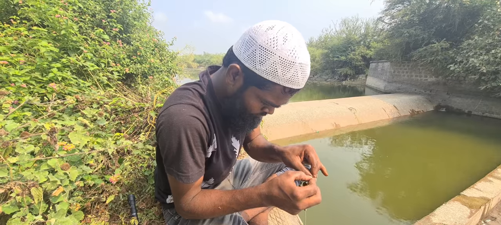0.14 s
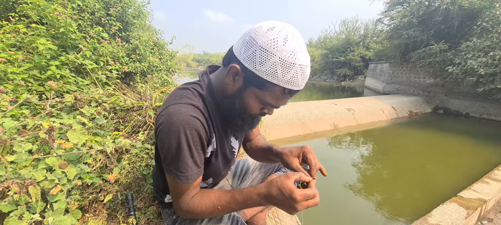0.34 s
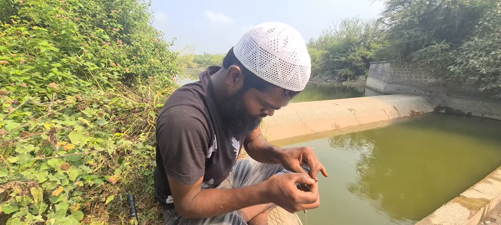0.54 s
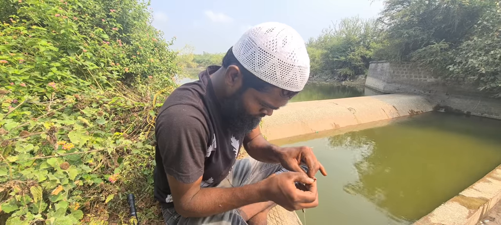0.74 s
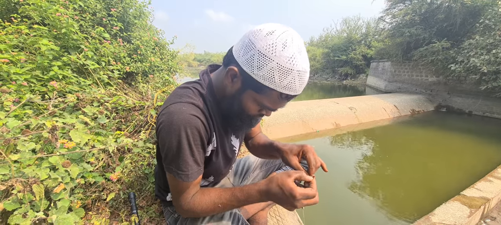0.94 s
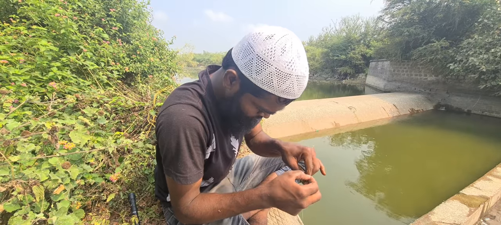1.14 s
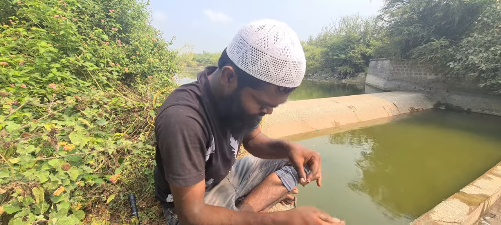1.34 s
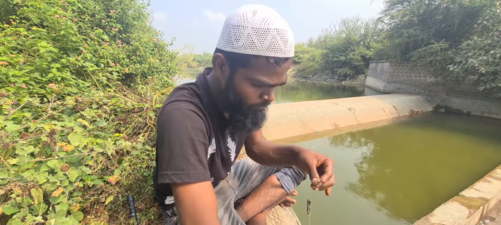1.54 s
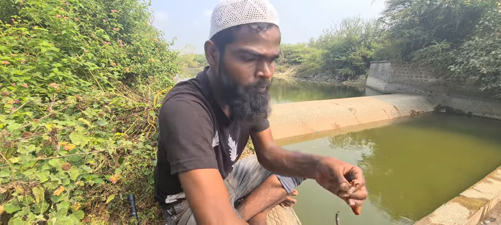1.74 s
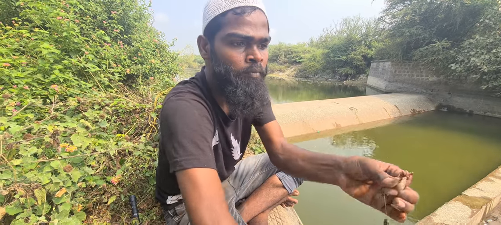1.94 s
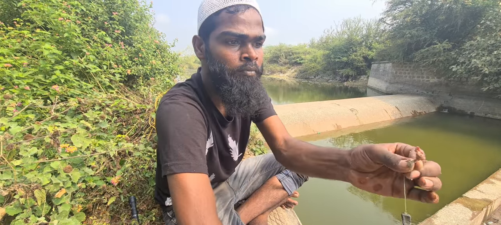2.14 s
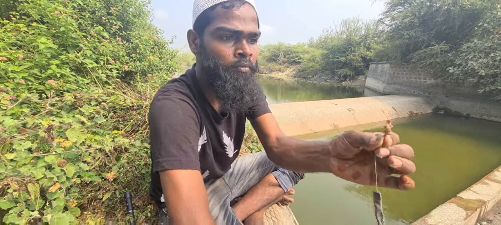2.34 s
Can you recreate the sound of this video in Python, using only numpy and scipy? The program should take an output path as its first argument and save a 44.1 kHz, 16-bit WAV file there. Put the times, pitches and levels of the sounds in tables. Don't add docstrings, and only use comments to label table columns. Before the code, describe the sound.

A near bird's clear, varied whistles end in a harsh pulsing buzz; behind it, rising chips turn into a rapid rattling trill blurred by leaves. Faint low pipes and quiet airy hiss surround them in the open.

```python
import sys
import numpy as np
from scipy import signal
from scipy.fft import rfft, irfft
from scipy.io import wavfile
from scipy.ndimage import uniform_filter1d

SR = 44100
rng = np.random.default_rng(int(sys.argv[2]) if len(sys.argv) > 2 else 0)


def invert_db(x):
    u = np.asarray(x, float) / 20
    return 10 ** u


def transcribe(signal):
    frames = np.atleast_2d(signal).T
    limited = np.clip(frames, -1, 1)
    pcm = np.round(limited * 32767).astype(np.int16)
    wavfile.write(sys.argv[1], SR, pcm)


N = 108045
LEAD = SR // 4


def slow(rate, size):
    r = np.exp(-2 * np.pi * rate / SR)
    x = signal.lfilter([1], [1, -2 * r, r * r], rng.standard_normal(size + 4000))[4000:]
    return x / x.std()


def coloured(points):
    hz = np.maximum(np.arange(N // 2 + 1) * SR / N, 10)
    points = np.array(points)
    gain = invert_db(np.interp(np.log(hz), np.log(points[:, 0]), points[:, 1]))
    x = irfft(rfft(rng.standard_normal(N)) * gain, N)
    return x / x.std()


def air():
    # f/Hz, density/dB
    air_colour = [(200, 2), (833, -7.5), (1330, -11), (2290, -13), (4010, -12), (8500, -14), (14300, -21),
                  (14700, -64)]
    # f/Hz, density/dB
    side_colour = [(18, -44), (30, 0), (263, -8.5), (816, -10.5), (1110, -4.5), (2530, -11), (3090, -24),
                   (6000, -25), (7800, -35), (13200, -120)]
    hiss_band = [2190, 16100]
    t = np.arange(N) / SR

    high_pass = signal.butter(4, 263.6, "high", fs=SR, output="sos")
    low_pass = signal.butter(2, 140, "low", fs=SR, output="sos")
    rumble = signal.sosfilt(low_pass, rng.standard_normal(N))
    mid = invert_db(-47 + 0.6 * slow(12.3, N)) * signal.sosfilt(high_pass, coloured(air_colour))
    mid = mid + invert_db(-77 + 1.5 * slow(5.5, N)) * rumble / rumble.std()

    hiss = signal.sosfilt(signal.butter(2, hiss_band, "band", fs=SR, output="sos"), mid)
    sink_db = -6.5 * np.clip((t - 2.165) / 0.13, 0, 1)
    mid = mid + hiss * (invert_db(sink_db) - 1)

    machine = invert_db(-66 + 3.5 * slow(30, N)) * np.sin(2 * np.pi * 1080 * t)
    opening = np.clip((t - 1.397) / 0.12, 0, 1)
    side = opening * (invert_db(-62.5) * coloured(side_colour) + machine)
    return mid + side * np.array([[1], [-1]])


def whistle(track, rows, warble=None, half_db=-94.0, rough=1, over_db=-94.0):
    s, hz, db = np.transpose(rows)
    t = np.arange(s[0], s[-1], 1 / SR)
    size = len(t)
    slur = max(1, int(min(0.0049, (s[-1] - s[0]) / 10) * SR))
    pitch = uniform_filter1d(np.interp(t, s, hz), slur, mode="nearest")
    rough_db, rough_hz = 1.6 * rough, 18 * rough
    level = np.interp(t, s, db) + rough_db * np.minimum(slow(257, size + 500)[:size], 1)
    if warble:
        bend, throb = warble(t)
        pitch, level = pitch + bend, level + throb
    pitch = pitch + rough_hz * slow(166, size + 500)[:size]
    phase = 2 * np.pi * np.cumsum(pitch) / SR
    tone = np.sin(phase)
    tone = tone + invert_db(half_db) * np.sin(phase / 2)
    tone = tone + invert_db(over_db) * np.sin(2 * phase)
    edge = np.clip(np.minimum(t - s[0], s[-1] - t) / 0.00061, 0, 1)
    i = LEAD + int(s[0] * SR)
    track[i:i + size] += np.sqrt(2) * invert_db(level) * edge * tone


def bushes(x, wet_db, scatter_s, late_db, t60):
    t = np.arange(SR) / SR
    decay = np.exp(-(t / scatter_s) ** 2) + invert_db(late_db - 60 * t / t60)
    tail = rng.standard_normal(SR) * decay * np.clip(t / 0.0066, 0, 1)
    return invert_db(wet_db) * signal.fftconvolve(x, tail / np.sqrt(np.sum(tail ** 2)))[LEAD:len(x)]


def strokes(track, marks, shape, growth=0):
    for s, db in marks:
        scale = 1 + 0.00693 * rng.standard_normal()
        note = np.array(shape) * [1, scale, 1] + [s, 0, db]
        note[:2, 2] += growth * (s - marks[-1][0]) * np.array([1, 0.5])
        whistle(track, note, rough=1.2)


def far_bird():
    # t/s, level/dB
    chip_marks = [(-.07, -46.5), (.068, -41.5), (.198, -42), (.319, -41), (.436, -40.5), (.547, -41),
                  (.657, -40), (.768, -39), (.872, -35.5)]
    # t/s from its mark, f/Hz, level/dB
    chip = [(-.008, 4900, -10), (-.004, 6000, 4), (-.001, 7050, 10), (.002, 8050, 2), (.006, 8800, -16)]
    # t/s, level/dB
    trill_marks = [(.947, -38), (1.02, -36.5), (1.08, -36), (1.141, -35.5), (1.204, -33.5), (1.267, -39),
                   (1.328, -33.5), (1.391, -32.5), (1.458, -32), (1.522, -31.5), (1.59, -31.5),
                   (1.654, -31), (1.721, -31), (1.79, -32), (1.857, -31.5), (1.926, -31.5), (1.996, -31.5),
                   (2.068, -30), (2.14, -31.5)]
    # t/s from its mark, f/Hz, level/dB
    stroke_up = [(-.029, 4550, -17), (-.025, 5300, -8), (-.021, 5950, -1), (-.015, 6500, 2),
                 (-.008, 6800, -3)]
    # t/s from its mark, f/Hz, level/dB
    stroke_down = [(-.005, 9200, -36), (-.001, 8650, -12), (.001, 8350, -2), (.005, 7550, -2),
                   (.01, 6800, 1), (.017, 6650, -7)]
    # t/s from its mark, f/Hz, level/dB
    stroke_low = [(0.016, 5582, -34), (0.025, 5890, 2.5), (0.033, 6900, -13)]

    clear, veiled, chips = np.zeros((3, N + LEAD))
    strokes(chips, chip_marks, chip)
    strokes(veiled, trill_marks, stroke_up, growth=28)
    strokes(clear, trill_marks, stroke_down)
    strokes(veiled, trill_marks, stroke_low)
    direct = clear + invert_db(-2) * veiled + invert_db(-6.5) * chips
    smear = bushes(direct, -3, scatter_s=0.007, late_db=-60, t60=1)
    echoes = bushes(clear + veiled + chips, 2, scatter_s=0.09, late_db=-7, t60=0.93)
    return direct[LEAD:] + smear + echoes


def near_leaves(x, wet_db):
    return bushes(x, wet_db, scatter_s=0.02, late_db=-5, t60=0.56)


def faint_piper():
    # t/s, f/Hz, level/dB
    pipes = [
        [(.424, 2650, -53), (.45, 2850, -39), (.482, 2700, -53)],
        [(.515, 2700, -51), (.56, 2700, -55.5), (.61, 2610, -55.5), (.64, 2640, -63)],
        [(.66, 2600, -61), (.71, 2810, -56), (.72, 2790, -55)],
        [(.745, 2410, -69), (.77, 2397, -52), (.79, 2370, -107)],
        [(0, 3270, -70), (.02, 3150, -51.5), (.04, 3710, -58)],
        [(2.11, 1080, -58), (2.13, 1080, -55.5), (2.2, 1080, -72)],
    ]
    track = np.zeros(N + LEAD)
    for note in pipes:
        whistle(track, note)
    return track[LEAD:] + near_leaves(track, -11)


def beats(t, table, top_s):
    s, rate, swing = np.transpose(table)
    turns = np.cumsum(np.interp(t, s, rate)) / SR
    return turns - np.interp(top_s, t, turns), np.interp(t, s, swing)


def round_warble(t):
    # t/s, rate/Hz, swing/Hz
    vibrato = [(.075, 108, 110), (.105, 112, 120), (.135, 112, 330), (.158, 96, 430), (.205, 78, 410),
               (.228, 82, 200), (.25, 82, 140), (.262, 82, 10)]
    turns, swing = beats(t, vibrato, 0.1865)
    wave = np.cos(2 * np.pi * turns)
    return swing * wave, 4.5 * wave * swing / swing.max()


def saw_warble(t):
    # t/s, rate/Hz, swing/Hz
    sawing = [(1.116, 41, 11.5), (1.15, 46, 300), (1.22, 51, 420), (1.299, 46, 900), (1.36, 44, 750),
              (1.45, 43, 600)]
    turns, swing = beats(t, sawing, 1.285)
    swing = swing * (1 + 0.2 * np.clip(slow(56.5, len(t)), -2, 1))
    drop = 1 - 0.72
    wave = uniform_filter1d(-signal.sawtooth(2 * np.pi * turns, drop), size=120)
    hush = uniform_filter1d(-6.0 * (turns % 1 < drop), size=60)
    return swing * (wave - 1), (5.5 * wave + hush) * swing / swing.max()


def near_bird():
    # t/s, f/Hz, level/dB
    lead_in = [(.044, 2270, -60), (.058, 2430, -42.5), (.073, 2600, -45)]
    # t/s, centre f/Hz, level/dB
    opening = [(.075, 2795, -42), (0.091, 2906, -40), (0.106, 2770, -42), (0.121, 3000, -39.5),
               (0.149, 3393, -34.5), (0.189, 3460, -34), (.222, 3860, -28), (.25, 4375, -25.5),
               (.27, 4513, -24)]
    # t/s, f/Hz, level/dB
    opening_fall = [(.278, 4426, -22.5), (.288, 4074, -22.5), (.3, 3500, -21), (.304, 3250, -36),
                    (.313, 2600, -42)]
    # t/s, f/Hz, level/dB
    flicks = [
        [(.429, 3660, -27), (.434, 4930, -27), (.441, 3860, -30.5), (.45, 2545, -38), (.466, 2340, -60)],
        [(.461, 5000, -35), (.468, 3730, -24), (.474, 3320, -36)],
        [(.502, 2930, -43), (.507, 3890, -26.5), (.512, 4800, -30.5), (.516, 5640, -31)],
        [(.45, 4800, -48), (.456, 5300, -39), (.461, 5100, -40)],
        [(.42, 3760, -40), (.425, 4000, -43), (.428, 4300, -42)],
        [(1.306, 6070, -39), (1.312, 5280, -30), (1.317, 6100, -42)],
        [(.688, 6400, -22), (.69, 5200, -26), (.692, 3980, -23)],
        [(1.039, 5780, -40), (1.043, 6460, -24.5), (1.047, 8000, -27.5), (1.054, 8840, -33), (1.065, 9400, -43)],
        [(.836, 6900, -36), (.839, 6020, -31), (.842, 6000, -38)],
        [(.841, 7260, -45), (.845, 7300, -35), (.849, 7560, -44)],
    ]
    # t/s, f/Hz, level/dB
    arch = [(.516, 2550, -50), (.53, 3150, -36), (.546, 3780, -24), (.558, 4230, -22), (.576, 4500, -18),
            (.606, 5080, -19.5), (.619, 5260, -30), (.63, 5100, -23), (.642, 3400, -36)]
    # t/s, f/Hz, level/dB
    fall = [(.698, 6630, -27), (.703, 5630, -22), (.709, 4740, -17.5), (0.722, 4250, -23.5),
            (0.731, 3830, -28.5), (0.742, 3140, -52)]
    # t/s, f/Hz, level/dB
    low_voice = [(.842, 4400, -62), (.851, 6300, -35), (.862, 6620, -30.5), (0.875, 6870, -29),
                 (.89, 6930, -29), (.901, 6870, -35), (.911, 6360, -36)]
    # t/s, f/Hz, level/dB
    high_voice = [(.863, 8780, -44), (.87, 8750, -39), (.889, 8850, -36), (.901, 9000, -36),
                  (.909, 8700, -35), (.914, 7300, -50)]
    # t/s, f/Hz, level/dB
    hook = [(0.93, 4170, -25), (.933, 6860, -29), (.938, 8300, -27), (0.946, 8850, -30.5),
            (0.952, 8040, -30), (0.964, 6500, -24), (0.978, 5400, -26), (0.981, 5240, -29),
            (0.985, 5170, -45)]
    # t/s, top f/Hz, level/dB
    closing = [(1.075, 9280, -29), (1.081, 6700, -23), (1.092, 8170, -30.5), (1.113, 7470, -24),
               (1.136, 7330, -27), (1.241, 7624, -29.5), (1.348, 7524, -30), (1.42, 7450, -31),
               (1.46, 7130, -43)]

    track, buzz = np.zeros((2, N + LEAD))
    whistle(track, opening + opening_fall, round_warble, rough=1.45)
    for note in [lead_in, arch, fall, high_voice, low_voice, hook] + flicks:
        whistle(track, note)
    whistle(buzz, closing, saw_warble, half_db=-32.5, rough=2.8, over_db=-42)
    return (track + buzz)[LEAD:] + near_leaves(buzz, -7) + near_leaves(track, -11)


def ragged_top(x):
    # t/s, f/Hz
    top_edge = [(0, 13900), (.08, 12800), (.3, 12800), (.37, 14000), (.44, 12800), (.75, 12400),
                (.9, 12900), (1.05, 12500), (1.45, 13100), (2.14, 13100), (2.2, 14000), (2.3, 15000)]
    hz, s, cells = signal.stft(x, SR, nperseg=2048)
    chance = rng.standard_normal((len(hz) // 5 + 1, len(s)))
    chance = uniform_filter1d(chance, size=2, axis=1) * np.sqrt(2)
    wander = 520 * np.repeat(chance, 5, axis=0)[:len(hz)]
    edge = np.interp(s, *np.transpose(top_edge)) + wander
    overtone = (hz[:, None] > 14800) & (s > 1.07) & (s < 1.27)
    keep = (hz[:, None] < edge) | overtone
    return signal.istft(cells * keep, SR, nperseg=2048)[1][:, :N]


def scene():
    return air() + far_bird() + faint_piper() + near_bird()


def band_limit(x):
    return signal.sosfilt(signal.butter(12, 15310, fs=SR, output="sos"), x)


def record(dry):
    return band_limit(ragged_top(dry))


dry = scene()
out = record(dry)
transcribe(out)
```